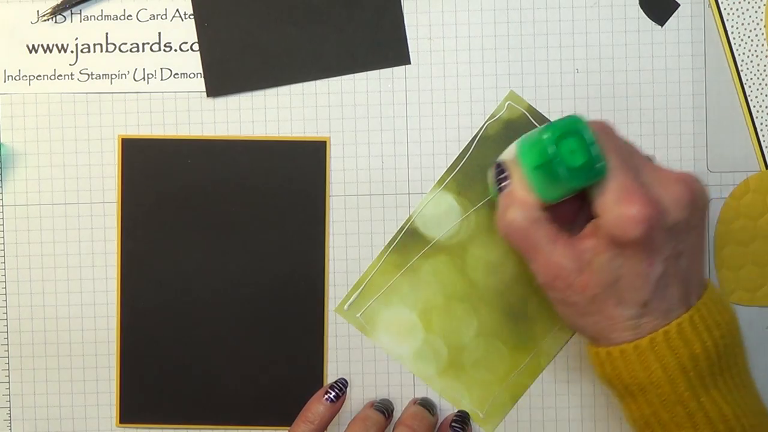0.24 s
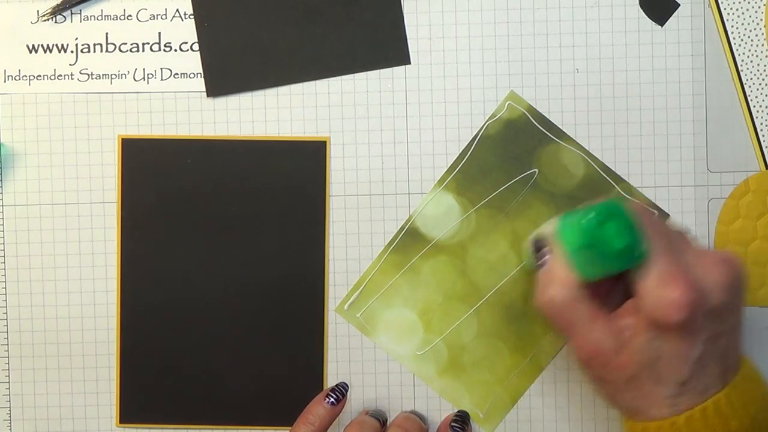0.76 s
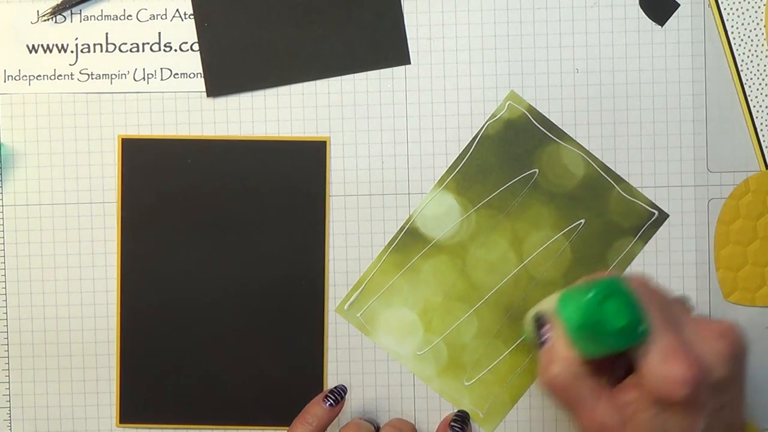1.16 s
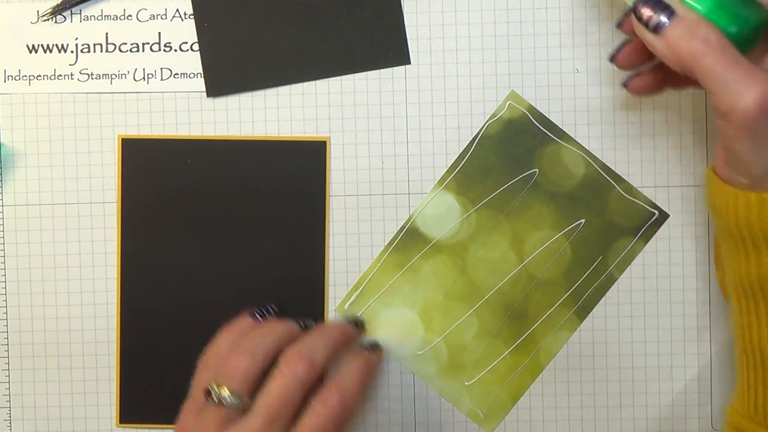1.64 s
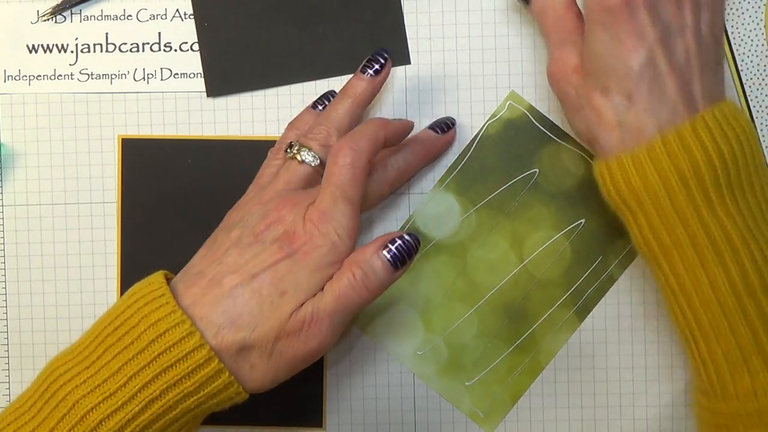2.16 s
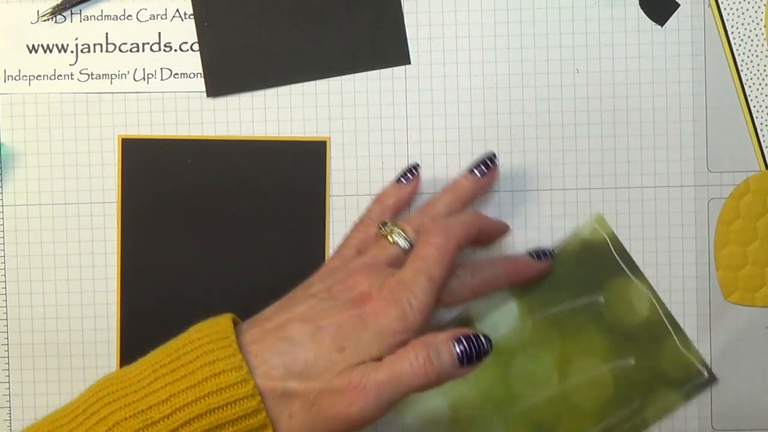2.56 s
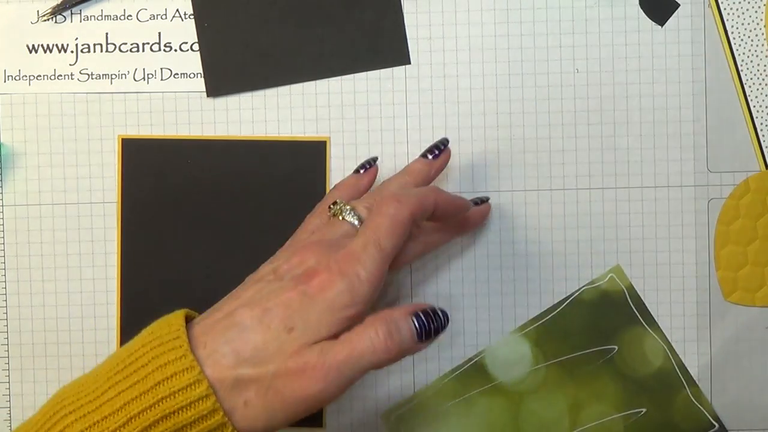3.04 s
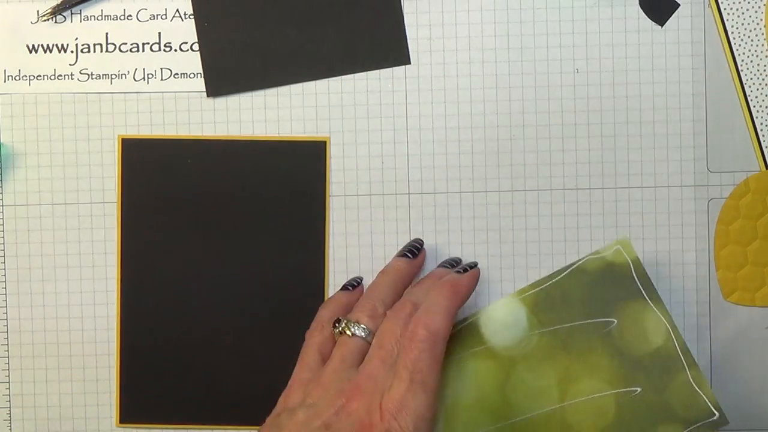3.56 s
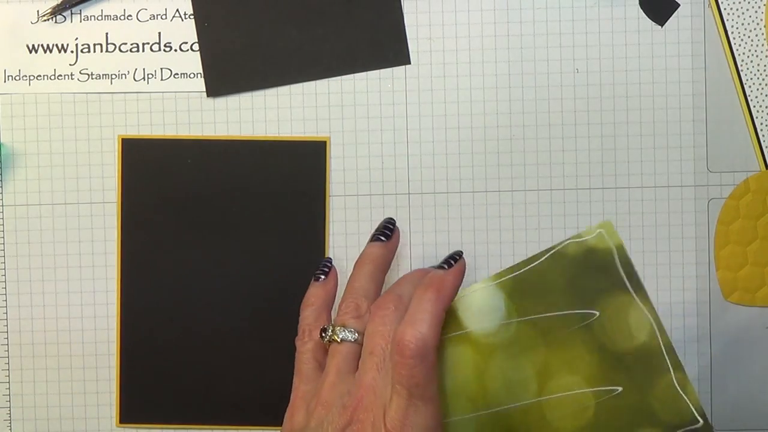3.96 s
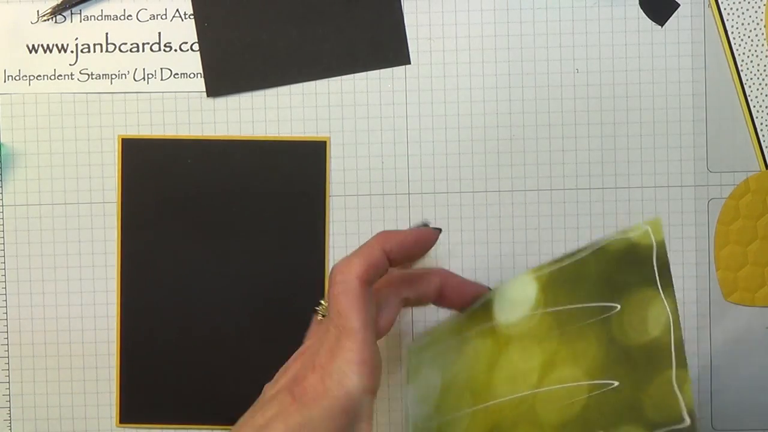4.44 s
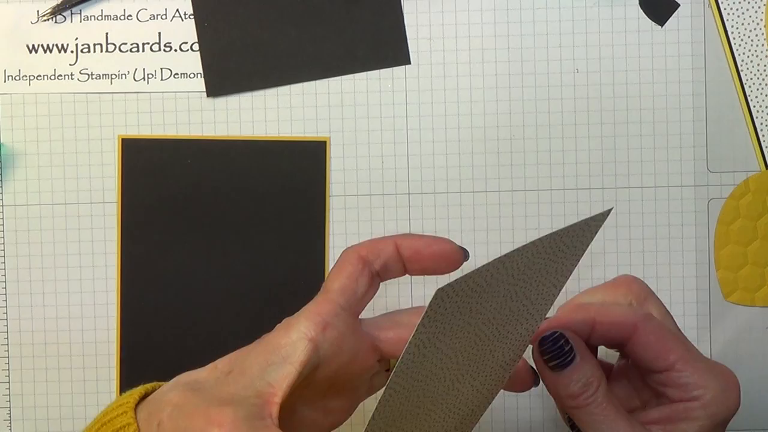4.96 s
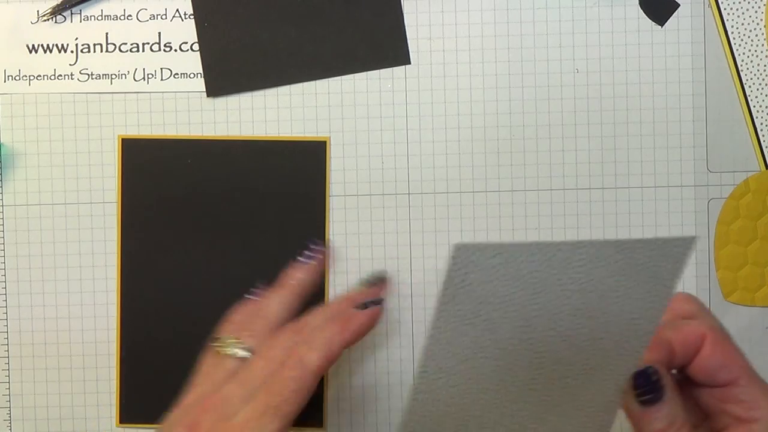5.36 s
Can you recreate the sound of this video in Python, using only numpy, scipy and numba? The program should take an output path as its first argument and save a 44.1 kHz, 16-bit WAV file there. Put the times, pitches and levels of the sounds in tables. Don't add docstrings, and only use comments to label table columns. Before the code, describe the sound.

A small, dry room with steady camera hiss, low mains hum and a very faint tick 25 times a second. From 0 to 1.4 s a glue nozzle drags over card in five short strokes: the first two, up to 0.7 s, are soft and dull; those at about 0.8, 1.0 and 1.2-1.3 s are stronger, gritty and hollow, with low table drumming and small squeaky digs. Between 1.42 and 1.57 s the plastic cap ratchets in a cluster of bright, sharp snaps, with a weaker click at 1.75. At 2.03 s the bottle is set down with the loudest sound, a hard knock with a short rattle, and a tiny bounce at 2.09. Card slides from 2.3 to 2.75 s, hissing brightly, peaking near 2.6, with crease clicks. Then faint brushes at 3.2-3.9 s, a very soft tap at 3.77, light creaks and flexing around 4.2-4.4, near quiet, and a dull tap and card rustle at 5.25-5.6 s.

```python
import sys
import numpy as np
from scipy import signal
from scipy.fft import rfft, irfft, next_fast_len
from scipy.io import wavfile
from scipy.ndimage import uniform_filter1d
from numba import njit

SR = 44100
rng = np.random.default_rng(int(sys.argv[2]) if len(sys.argv) > 2 else 0)


def ratio(d):
    e = np.asarray(d, float) / 20
    return 10 ** e


def transcribe(u):
    v = np.clip(np.atleast_2d(u).T, -1, 1)
    q = np.round(v * 32767).astype(np.int16)
    wavfile.write(sys.argv[1], SR, q)


N = 246519
TIME = np.arange(N) / SR

# (multiple of mains, level [dB])
HUM_HARMONICS = [(1, -77), (2, -66.5), (3, -74.5), (4, -68.5), (5, -77.5), (6, -87)]
# (frequency [Hz], level per Hz [dB])
HISS_COLOUR = [(25, -17), (45, -9.5), (90, -1.5), (300, -2), (600, -7), (1000, -6.5), (1180, -10),
               (1350, -3), (1520, -6), (1800, -10), (3000, -11.5), (6000, -13.5), (12000, -15.5),
               (16000, -18)]
# (frequency [Hz], side minus mid [dB])
HISS_WIDTH = [(40, 6), (200, -6.5), (1000, -11), (2000, -14.5), (3500, -16), (7000, -9.5), (15000, -18.5)]
# (frequency [Hz], time to fall 60 dB [s])
ECHO_TIMES = [(150, 0.3), (500, 0.17), (1500, 0.17), (3000, 0.068), (6000, 0.027), (14000, 0.089)]
# (time [s], blow [dB], contact [ms], left minus right [dB])
TABLE_BLOWS = [
    (2.029, -12.5, 0.09, 1.5),
    (2.093, -31.5, 0.65, -.5),
    (3.769, -45, 1.9, 0),
    (5.244, -34, 1.85, 2),
]
# (frequency [Hz], level [dB], time to fall 60 dB [s])
KNOCK_RING = [(156, -26, 0.2), (206, -25.5, 0.19), (250, -25, 0.13), (319, -29.5, 0.21), (410, -11, 0.059),
              (450, -25, 0.037), (624, -25, 0.08), (960, -22.5, 0.041), (557, -6.5, 0.027),
              (832, -24.5, 0.09), (1310, -11.5, 0.023), (1793, -17.5, 0.033), (2020, -24, 0.024),
              (2540, -23, 0.034), (2770, -29, 0.03), (3150, 12, 0.0038), (3780, 0.5, 0.0061),
             (4650, 2, 0.0038), (5400, -7.5, 0.0056), (6500, 1, 0.0032), (3300, -30, .015),
             (4240, -33, 0.0092), (8400, -12, 0.0037), (10000, -11, 0.0049), (12000, -9, 0.0046),
             (14300, -8, 0.0034)]
# (time [s], peak [dB], centre [Hz], low share [dB], low centre [Hz])
CAP_SNAPS = [(1.4204, -41, 7800, -16, 1350), (1.4295, -46, 7570, -9, 1420),
             (1.4512, -33.5, 11000, -7, 1540), (1.4607, -23.5, 10200, -38, 4070),
             (1.4924, -26, 8930, -11, 4500), (1.4996, -19.5, 12500, -18.5, 2780),
             (1.5344, -17, 12100, -43, 3980), (1.5665, -21.5, 4430, -15, 2680),
             (1.7505, -35, 6500, -6, 3200)]
# (time [s], peak [dB], centre [Hz], low
# share [dB], low centre [Hz])
CARD_SNAPS = [(0.7493, -34, 10400, -30, 1770), (1.295, -34.5, 8500, -13, 1990),
              (2.0932, -35, 5270, 1, 1900), (2.22, -39, 12000, -30, 1510), (2.306, -26.5, 10300, -20, 3000),
              (2.4435, -29, 9100, -30, 3690), (2.4962, -31.5, 8100, -29, 3610),
              (2.559, -33, 7100, -23, 3640), (3.918, -42, 6700, -10, 2590), (5.2435, -31, 10400, -17, 4760)]
# (frequency [Hz], width [Hz], level [dB])
SHEET_PEAKS = [(3760, 800, -7.5), (5750, 2000, -0.5), (7900, 4700, 2), (10300, 4300, 2.5),
               (13700, 7000, 3.5)]
# (start [s], peak [s], end [s], peak level [dB], centre [Hz])
BRUSHING = [(.69, .726, 0.73, -54, 10300), (1.39, 1.44, 1.45, -60, 10200), (1.44, 1.478, 1.504, -50, 10300),
            (1.5, 1.54, 1.6, -55, 9800), (1.54, 1.585, 1.644, -55, 8700), (1.6, 1.7, 1.96, -65, 10000),
            (2.08, 2.12, 2.8, -65.5, 11900), (2.23, 2.3, 1.6, -66, 10000), (3.09, 3.174, 3.2, -60.5, 8900),
            (3.24, 3.33, 3.6, -65, 8900), (3.42, 3.455, 3.47, -65, 8500), (3.5, 3.555, 3.5, -50, 7500),
            (3.75, 3.78, 3.81, -70, 8100), (3.87, 3.91, 3.94, -57, 7900), (3.92, 3.97, 3.97, -61.5, 7050),
            (4.26, 4.306, 4.16, -56.5, 7000), (5.295, 5.316, 5.38, -61, 9600),
            (5.31, 5.349, 5.358, -52.5, 9100), (5.572, 5.584, 5.63, -59, 9800),
            (2.56, 2.6, 2.616, -48, 6740)]
# (start [s], peak [s], end [s], peak level [dB], centre [Hz])
FLEXING = [(1.065, 1.082, 1.15, -50.5, 330), (2.092, 2.096, 2.096, -51, 890),
           (2.092, 2.096, 2.155, -43.5, 150), (1.43, 1.475, 1.48, -61, 2500), (1.5, 1.55, 1.73, -63, 2490),
           (3.26, 3.33, 3.75, -67, 2300), (3.38, 3.46, 3.43, -63, 2300), (3.74, 3.78, 3.78, -60, 2000),
           (3.85, 3.91, 4.2, -65.5, 2200), (4.17, 4.44, 4.35, -56, 1900), (5.3, 5.314, 5.35, -56.5, 3820),
           (5.31, 5.35, 5.37, -57, 2410), (5.26, 5.33, 5.57, -64.5, 435), (5.572, 5.584, 6, -63, 2600)]
# (start [s], peak [s], end [s], peak level [dB], pitch [Hz])
CREAKING = [
    (4.3, 4.33, 4.39, -60, 1400),
    (4.27, 4.3, 4.335, -62, 4900),
    (4.21, 4.232, 4.26, -62.5, 1300),
    (4.26, 4.277, 4.3, -63, 2200),
    (4.185, 4.205, 4.25, -62, 3000),
    (1.068, 1.082, 1.105, -46, 265),
    (1.1, 1.114, 1.13, -50, 255),
    (1.2, 1.25, 1.3, -51, 420),
]
# (time [s], hiss [dB])
LONG_SLIDE = [(2.311, -58), (2.4, -49.5), (2.49, -45.5), (2.54, -46.5), (2.57, -46.5), (2.605, -41),
              (2.656, -46.5), (2.7, -49.5), (2.746, -70)]
# (time [s], scrape [dB], weight on the table above the scrape [dB])
NOZZLE_STROKES = [
    [(0.03, -75, 0), (0.19, -61, 4), (0.24, -63.5, 6.5), (0.36, -62, 2), (0.4, -79, -3)],
    [(0.43, -76, 0), (0.474, -59, 5), (0.51, -54.5, 5), (0.56, -53, 4), (0.646, -69, 13), (0.7, -72, 5)],
    [(0.752, -79, 0), (0.764, -52.5, 0), (0.812, -48.5, -5), (0.876, -55.5, 2), (0.92, -76, -6)],
    [(0.93, -76, 6), (0.94, -64.5, 7), (0.994, -54.5, -2), (1.05, -52.5, 2), (1.08, -51.5, 5),
     (1.114, -64, 0), (1.15, -70, 5)],
    [(1.16, -63, -1), (1.208, -49.5, -5.5), (1.254, -53, 4), (1.29, -45.5, -5), (1.31, -62.5, -3),
     (1.4, -80, 4)],
]
# (bottle wall landing [Hz], wall lifting [Hz], table unloaded [Hz])
STROKE_GRIPS = [(1980, 1630, 335), (2130, 2130, 332), (1850, 2100, 308), (2000, 1550, 343),
                (1800, 2100, 435)]
# (time [s], length [s], neck squeal [dB], fibre crunch [dB])
TIP_DIGS = [(0.18, .05, 11, 6), (0.313, 0.092, 11, 1), (0.493, .06, 11, 0), (0.793, 0.046, 6, 0),
            (1.054, .07, 13.5, 8), (1.256, 0.073, 17, 11.5)]
# (frequency [Hz], width [Hz], level [dB])
BOTTLE_PEAKS = [(1370, 230, -10.5), (2750, 480, 2.5), (3150, 340, -4), (4700, 1000, 0.5),
                (5720, 1300, -4.5)]
# (frequency [Hz], width [Hz], level [dB])
DRUM_PEAKS = [(196, 32, -1.5), (276, 91, -2.5), (396, 53, -7.5), (595, 84, -4), (910, 450, -1)]


def level(x, db=0):
    return x * ratio(db) / np.sqrt(np.mean(x ** 2))


def colour(x, points):
    hz, db = np.transpose(points)
    size = next_fast_len(len(x))
    f = np.maximum(np.fft.rfftfreq(size, 1 / SR), 1)
    gain = ratio(np.interp(np.log(f), np.log(hz), db))
    return irfft(rfft(x, size) * gain, size)[:len(x)]


@njit
def svf(x, g, k):
    y, b, l = np.empty(len(x)), 0., 0.
    for i in range(len(x)):
        v = (b + g[i] * (x[i] - l)) / (1 + g[i] * (g[i] + k[i]))
        b, l, y[i] = 2 * v - b, l + 2 * g[i] * v, k[i] * v
    return y


def band(x, hz, width_hz):
    hz = np.clip(hz, 30, .44 * SR)
    return svf(x, np.tan(np.pi * hz / SR) + 0 * x, width_hz / hz + 0 * x)


def body(x, peaks):
    total = 0
    for k, (hz, width_hz, db) in enumerate(peaks):
        total = total + (-1) ** k * ratio(db) * band(x, hz, width_hz) / np.sqrt(width_hz)
    return level(total)


def walk(rate):
    hold = int(SR / rate)
    steps = np.repeat(rng.standard_normal(N // hold + 1), hold)
    return level(uniform_filter1d(steps, hold)[:N])


def grit(spread_db, catch_db, catch_rate):
    size_db = spread_db * rng.exponential(size=N)
    pressure_db = catch_db * walk(catch_rate)
    return level(rng.standard_normal(N) * ratio(size_db + pressure_db))


def pan(x, db):
    return x * ratio(np.array([db + 0 * x, -db + 0 * x]) / 2)


def hum():
    mains_hz, dip_s = 49.99, .0098
    turn = 2 * np.pi * mains_hz * (TIME - dip_s)
    buzz = 0
    for k, db in HUM_HARMONICS:
        buzz = buzz - np.sqrt(2) * ratio(db + 0.54 * walk(3.1)) * np.cos(k * turn)
    return pan(buzz, -3 + 1 * walk(3.05))


def camera():
    mains_hz, hiss_db = 49.99, -58.5
    spark = 1 + 0.3 * ((TIME * 2 * mains_hz) % 1 < .08)
    mid = colour(rng.standard_normal(N) * spark, HISS_COLOUR)
    side = colour(colour(rng.standard_normal(N), HISS_COLOUR), HISS_WIDTH)
    hiss = level(mid + side * np.array([[1], [-1]]), hiss_db)
    tick_start_s, tick_gap_s, tick_hz, tick_db = .0345, 1 / 25, 2640, -74.5
    kicks = np.zeros(N)
    at = (np.arange(tick_start_s, N / SR, tick_gap_s) * SR).astype(int)
    kicks[at] = ratio(0.65 * rng.standard_normal(len(at)))
    return hiss + level(band(band(kicks, tick_hz, 230), tick_hz, 230), tick_db)


def room(x):
    room_db, gap_s = -15, 0.0031
    t, tail = TIME[:SR // 2], 0
    hz, t60 = np.transpose(ECHO_TIMES)
    for f in 120 * 2 ** np.arange(0, 7, .5):
        mid, side = (band(rng.standard_normal(len(t)), f, f / 2) for _ in range(2))
        fade = ratio(-60 * t / np.interp(np.log(f), np.log(hz), t60))
        fade = fade * np.clip(t / gap_s - 1, 0, 1)
        spread = 0.22 * (500 / f) ** 0.11 * side * np.array([[1], [-1]])
        tail = tail + min(f / 450, 1) * fade * (mid + spread)
    tail = tail * ratio(room_db) / np.sqrt(np.sum(tail[0] ** 2))
    return signal.fftconvolve(x[None], tail, axes=1)[:, :N]


def knocks():
    out, t = np.zeros((2, N)), TIME[:SR // 4]
    ring = 0
    for k, (hz, db, t60) in enumerate(KNOCK_RING):
        swell = 1 - np.exp(-t * hz / 0.73)
        ring = ring + (-1) ** k * ratio(db - 60 * t / t60) * swell * np.sin(2 * np.pi * hz * t)
    rattle = grit(3.3, catch_db=4.0, catch_rate=180)[:len(t)]
    rattle = rattle * ratio(-60 * t / 0.23) * (1 - np.exp(-t / 0.0021))
    ring = ring + ratio(-10) * band(band(rattle, 2700, 3100), 2700, 3100)
    for s, db, contact_ms, pan_db in TABLE_BLOWS:
        push = np.sin(np.pi * np.clip(t[:200] * 1000 / contact_ms, 0, 1))
        blow = ratio(db) * np.convolve(ring, push / push.sum())[:len(t)]
        i = int(s * SR)
        out[:, i:i + len(t)] += pan(blow, pan_db)
    return out


def clicks(table, pan_db, ring_s):
    out, t = np.zeros(N), TIME[:SR // 16]
    noises = rng.standard_normal((len(table), len(t)))
    for (s, db, hz, low_db, low_hz), noise in zip(table, noises):
        t60 = ring_s * ratio(-0.15 * (db + 20))
        rattle = ratio(-60 * t / max(t60, .002)) + 0.043 * ratio(-60 * t / 0.071)
        snap = 4.9 * (t == 0) + noise * rattle
        high = band(band(snap, hz, 0.46 * hz), hz, 0.77 * hz)
        high = high + 0.8 * band(band(snap, 8500, 12500), 9200, 12500)
        low = band(band(snap, low_hz, 2000), low_hz, 2000)
        click = high / np.abs(high).max() + ratio(low_db) * low / np.abs(low).max()
        i = int(s * SR)
        out[i:i + len(t)] += ratio(db) * click
    return pan(out, pan_db)


def card():
    out = np.zeros(N)
    rub = body(grit(1.8, catch_db=0.5, catch_rate=60), SHEET_PEAKS)
    flex = grit(2.4, catch_db=-0.5, catch_rate=46)

    def hiss(span, hz):
        return level(band(band(rub[span], hz, 0.79 * hz), hz, 0.87 * hz))

    def sheet(span, hz):
        return level(band(band(flex[span], hz, 1.0 * hz), 1.24 * hz, 4200))

    def creak(span, hz):
        return level(band(band(flex[span], hz, .25 * hz), hz, 0.45 * hz))

    fade_depth_db, roundness = 20, 1.4
    for table, voice in ((BRUSHING, hiss), (FLEXING, sheet), (CREAKING, creak)):
        for start, peak, end, db, hz in table:
            span = slice(int(start * SR), int(end * SR))
            away = np.interp(TIME[span], [start, peak, end], [1, 0, 1])
            out[span] += ratio(db - fade_depth_db * away ** roundness) * voice(span, hz)
    s, db = np.transpose(LONG_SLIDE)
    span = slice(int(s[0] * SR), int(s[-1] * SR))
    db = np.interp(TIME[span], s, db)
    centre_hz = 8900 - 56 * (db + 45.5)
    out[span] += ratio(db) * (hiss(span, centre_hz) + ratio(-15) * sheet(span, 3050))
    return pan(out, -1.9)


def nozzle():
    rows = []
    for stroke, (landing_hz, lifting_hz, unloaded_hz) in zip(NOZZLE_STROKES, STROKE_GRIPS):
        for s, db, weight_db in stroke:
            grip_hz = np.interp(s, [stroke[0][0], stroke[-1][0]], [landing_hz, lifting_hz])
            rows.append((s, db, weight_db, grip_hz, unloaded_hz))
    s, *columns = np.transpose(rows)
    t = TIME[:int(s[-1] * SR)]
    scrape_db, drum_db, wall_hz, table_hz = (np.interp(t, s, c) for c in columns)
    drum_hz = table_hz - 7 * drum_db
    neck_db, crunch_db = -13.5, -12
    for at, length, squeal, crunch in TIP_DIGS:
        dig = np.exp(-(2 * (t - at) / length) ** 2)
        neck_db = neck_db + squeal * dig
        crunch_db = crunch_db + crunch * dig
    rub, thud = (grit(2.2, catch_db=1.0, catch_rate=rate)[:len(t)] for rate in (90, 40))
    scrape = level(band(rub, wall_hz, 230), -7.0)
    scrape = scrape + level(body(rub, BOTTLE_PEAKS), -2.2) + level(band(rub, 1900, 2300), -4)
    neck = level(band(band(rub, 3730, 420), 3280, 1050))
    drum = level(band(body(thud, DRUM_PEAKS), drum_hz, 540), -0.99)
    drum = drum + level(band(band(thud, drum_hz, 128), drum_hz, 270), -4)
    fibres = level(band(band(rub, 7400, 9800), 6800, 8300))
    drag = scrape + ratio(drum_db) * drum + ratio(neck_db) * neck + ratio(crunch_db) * fibres
    out = np.zeros(N)
    out[:len(t)] = drag * ratio(scrape_db)
    return pan(out, -1.4)


def scene():
    cap = clicks(CAP_SNAPS, pan_db=-2.5, ring_s=0.0088)
    creases = clicks(CARD_SNAPS, pan_db=-1.5, ring_s=0.014)
    table = nozzle() + card() + cap + creases + knocks()
    heard = table + room(table.mean(axis=0))
    heard = heard + 0.13 * band(heard.mean(axis=0), 220, 220) * np.array([[-1], [1]])
    bass_cut = signal.butter(3, 140, "high", fs=SR, output="sos")
    return signal.sosfilt(bass_cut, heard) + hum() + camera()


def band_limit(x):
    return signal.sosfilt(signal.butter(12, 16810, fs=SR, output="sos"), x)


def record(dry):
    top_cut = signal.ellip(10, .3, 45, 15700, fs=SR, output="sos")
    mix = signal.sosfilt(top_cut, dry)
    return band_limit(mix)


dry = scene()
out = record(dry)
transcribe(out)
```